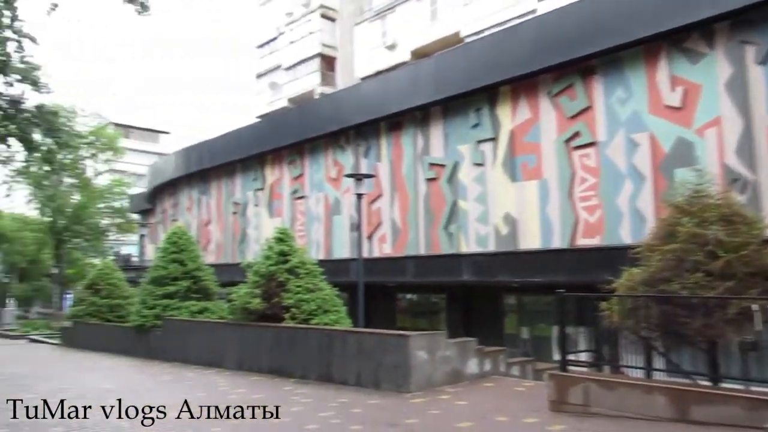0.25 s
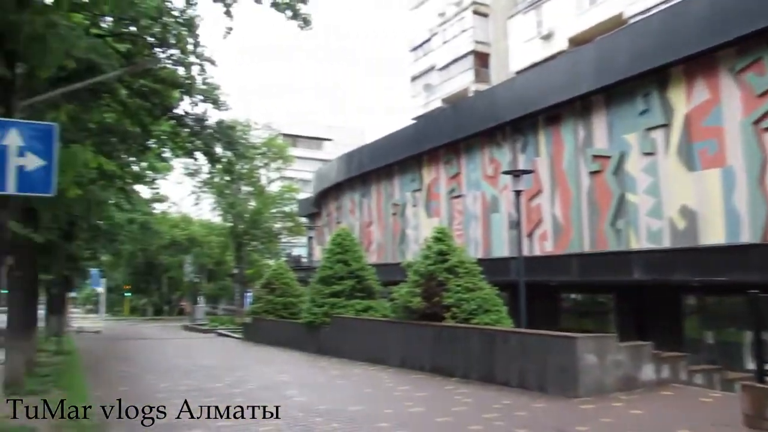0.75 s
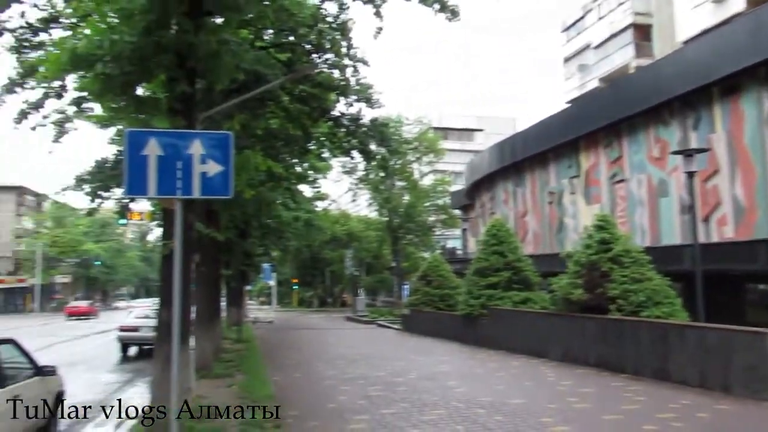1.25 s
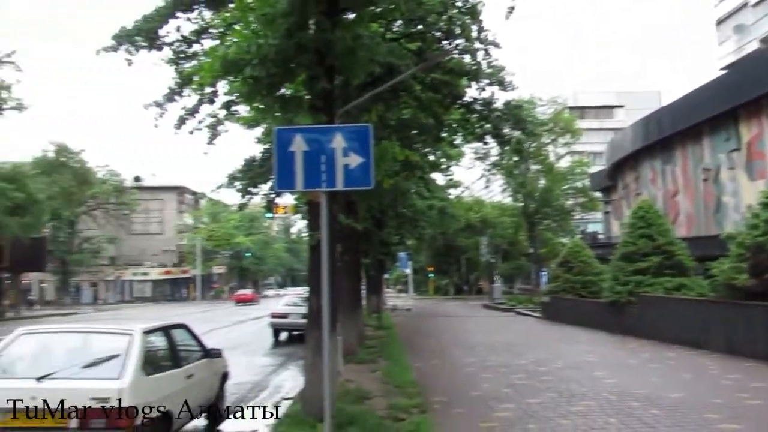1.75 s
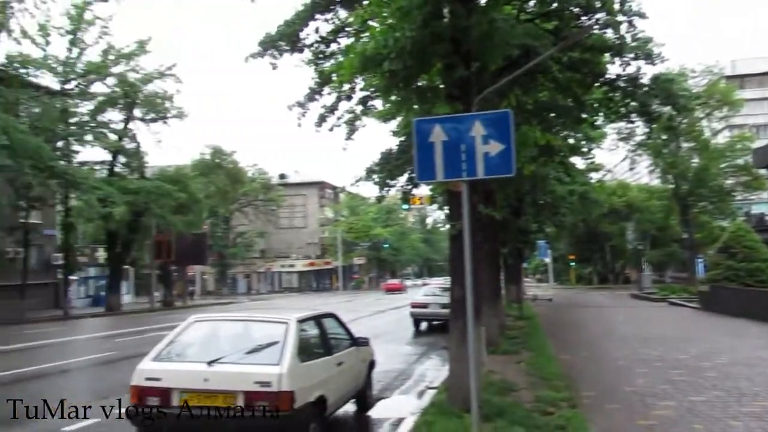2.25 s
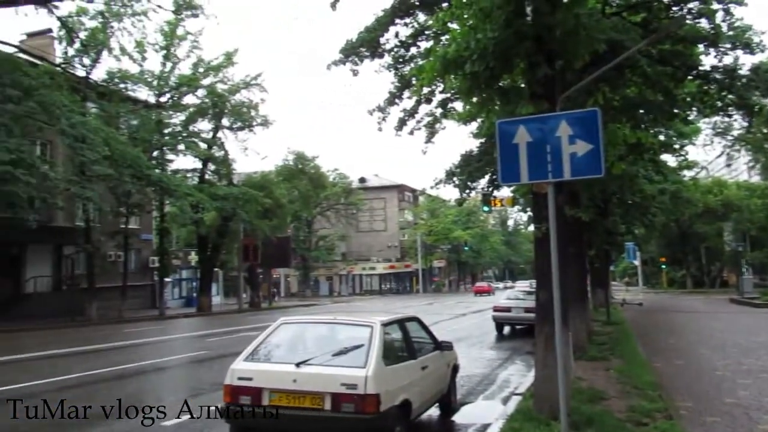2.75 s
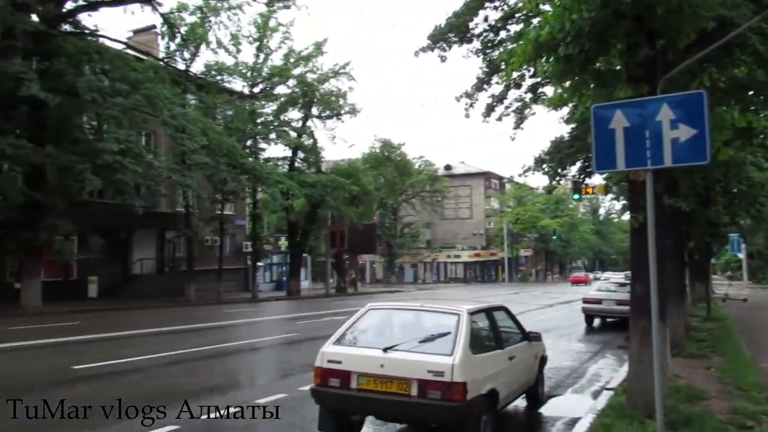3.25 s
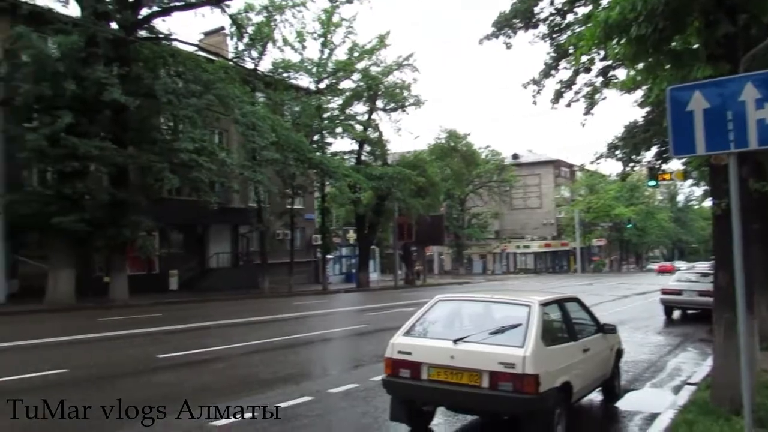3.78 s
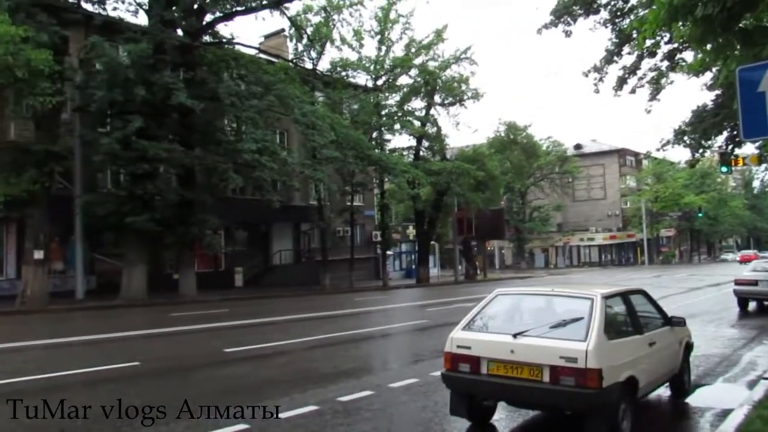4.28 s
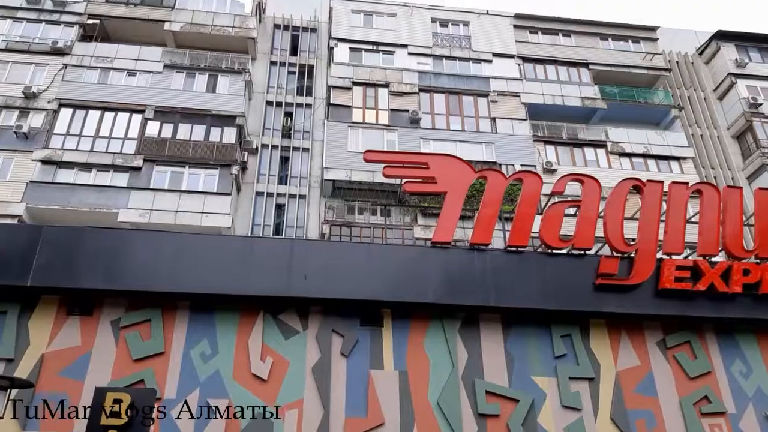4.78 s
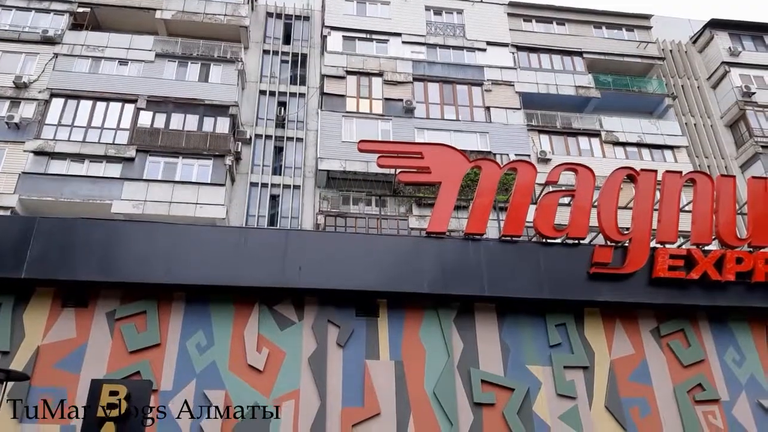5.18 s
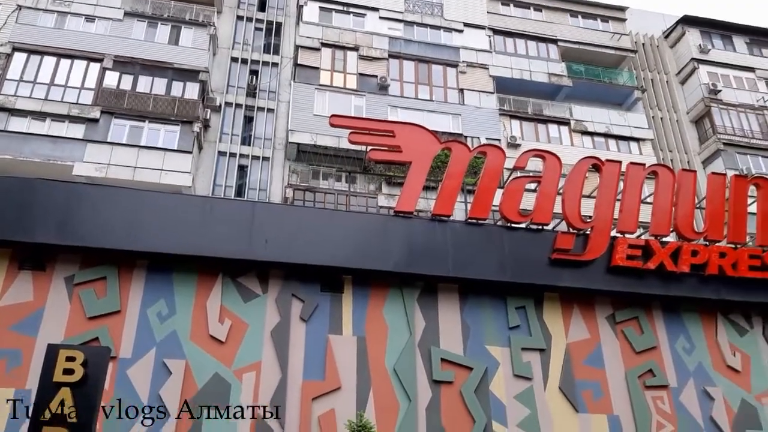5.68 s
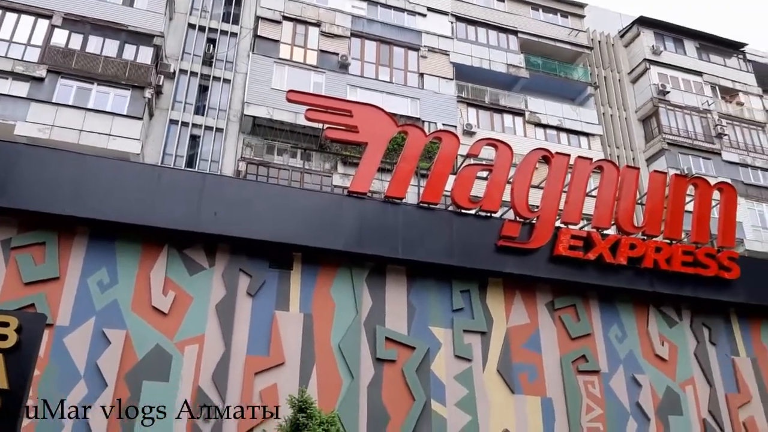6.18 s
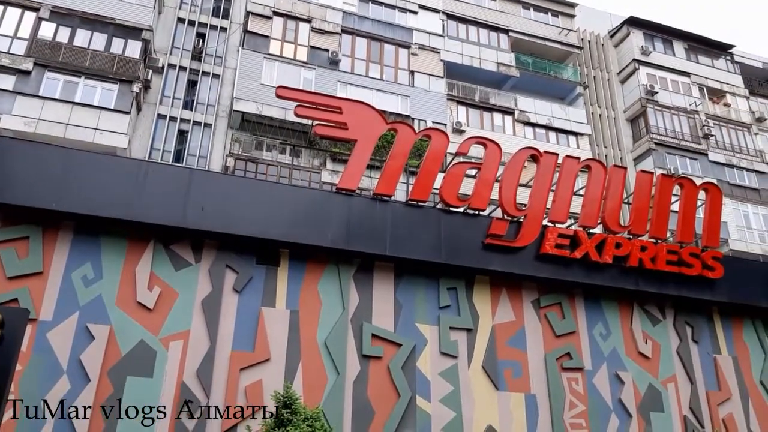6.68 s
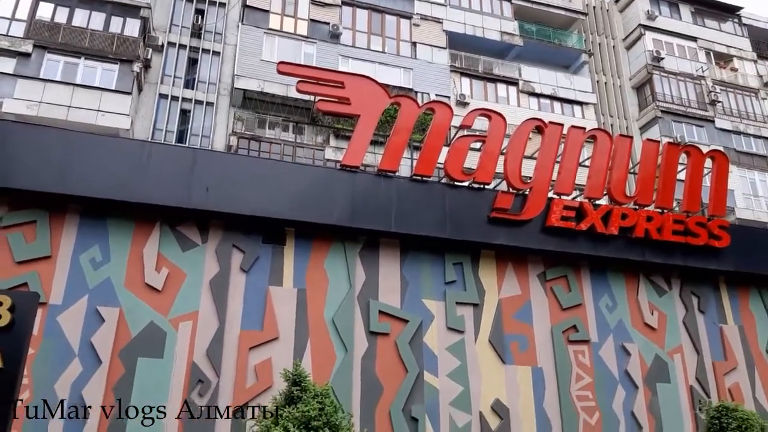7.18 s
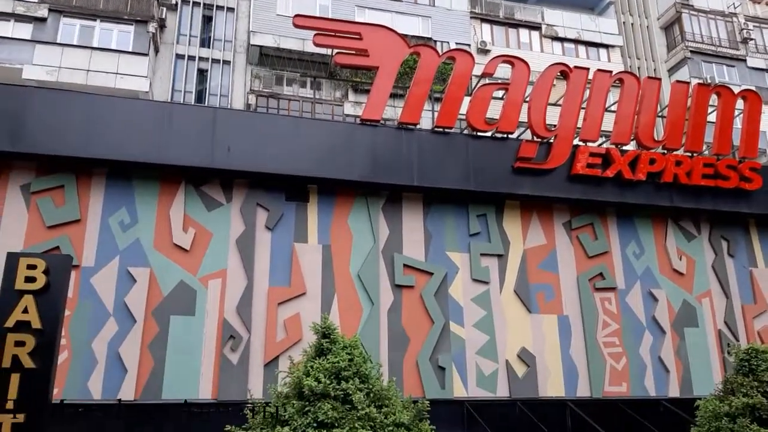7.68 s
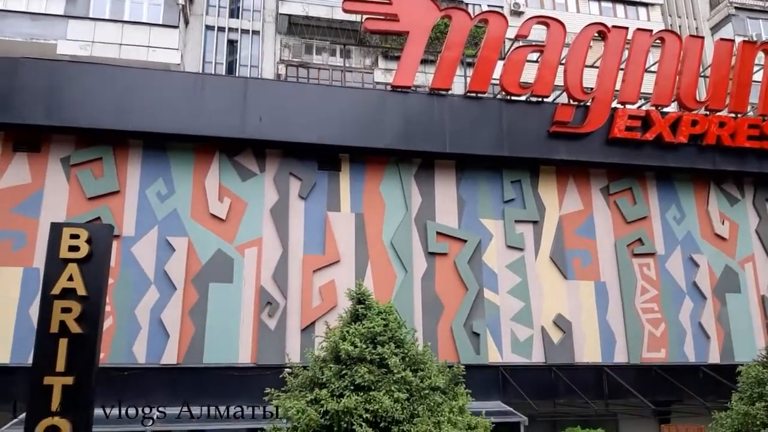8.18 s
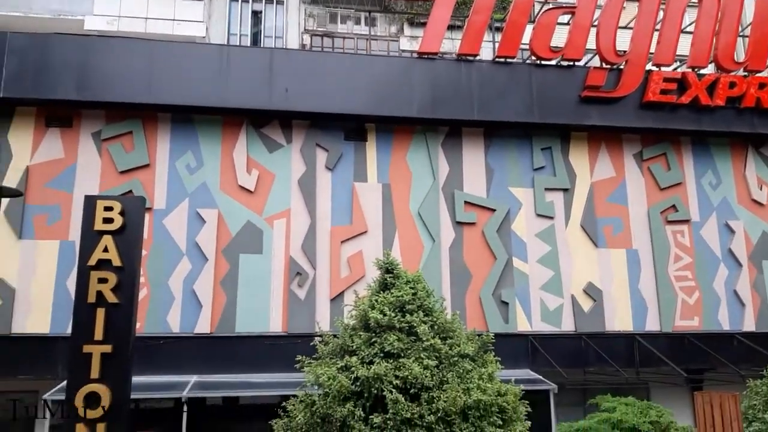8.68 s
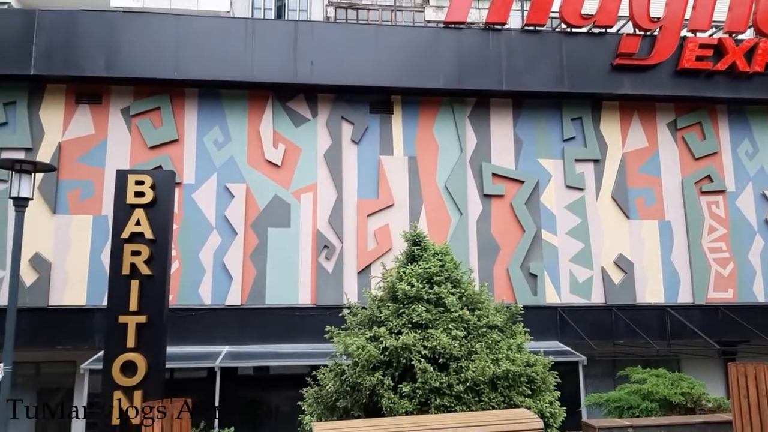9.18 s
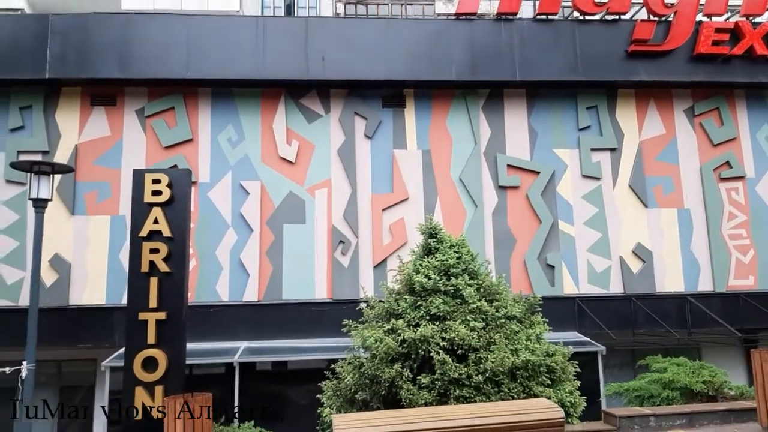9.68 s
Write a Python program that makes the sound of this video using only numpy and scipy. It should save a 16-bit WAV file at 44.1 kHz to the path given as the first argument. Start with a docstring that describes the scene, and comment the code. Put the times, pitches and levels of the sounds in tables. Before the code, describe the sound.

Outdoors on a wet city street, stereo microphone close to the lane: lumpy low rumble, idling engine and drone, broad tyre roar, a couple of dull wheel thumps near one second, and sizzling spray growing as a car nears. An abrupt cut and tiny silence at 4.6 seconds, then a quieter spot back from the road: tyre hiss fades while a heavy vehicle pulls away, rising in pitch with metallic rattle, faint ticks, brief bird chirps and thin brake squeals.

```python
"""Wet city street, two spots. At the kerb: lumpy rumble noise, idling engine and drone as sine orders,
tyre roar as shaped noise, rising spray of a nearing car as dense clicks, a few wheel thumps.
After a short silence, set back from the road: rumble, hiss and spray noise; a heavy vehicle pulls away,
its orders swelling and sinking as they rise, its rattle as clicks ringing in metal modes.
Treble ticks are noise bursts, birds short fluttering notes, brake squeals a stuttering sine."""
import sys
import numpy as np
from scipy import signal
from scipy.io import wavfile
from scipy.ndimage import uniform_filter1d

SR = 44100
rng = np.random.default_rng(int(sys.argv[2]) if len(sys.argv) > 2 else 0)


def inscribe(sig):
    """Save sig as 16-bit PCM at rate SR to the path in sys.argv[1].

    A 1-D sig is mono; a 2-D sig holds one channel per row.
    Samples are clipped to [-1, 1] before scaling.
    """
    pcm = np.round(np.clip(np.atleast_2d(sig).T, -1, 1) * 32767)
    wavfile.write(sys.argv[1], SR, pcm.astype(np.int16))


N = 438354
STOP_S, RESUME_S = 4.5834, 4.6192   # silence between the spots

# Stereo pairs: f/Hz, likeness 0-1, right lead/rad, right level/dB
KERB_PAIR = [(40, .95, 1.8, -5), (90, 0.98, 1.3, -4.5), (200, 1, 0.75, -2.5), (450, 0.82, -0.0024, -2.5),
             (1000, 0.85, 0.2, -2), (1500, 0.93, 0.29, -0.5), (2020, 1, -0.016, -0.5),
             (3930, 1, -0.16, 0.1), (5500, 0.77, -0.29, -1), (11000, 0.66, -1.38, -2.5),
             (15000, .25, -1.5, -1.5)]
BACK_PAIR = [(40, 0.99, .95, -5), (150, 1, 1.02, -3), (297, 0.64, 0.45, 1), (510, .42, 0.49, -2),
             (734, 0.53, 2.7, -2.5), (965, 0.34, 5.14, 0), (1370, 0.75, 5.7, -1.5), (1900, 0.25, 7, 1.5),
             (3070, 0.18, 8.2, 6.5), (5170, 0.14, 7.1, -4.5), (9000, 0.24, 9.1, 0), (12500, .1, 8.1, -4.5)]
SPRAY_PAIR = [(3000, .5, 9, 5), (3900, 0.55, 7.4, 3), (4800, .5, 6.3, 0), (7500, 0.3, 9.5, 0.5),
              (12000, .2, 8, 0)]
RATTLE_PAIR = [(1500, 1, 3.14, 28), (2400, 1, 3.14, 24), (3600, 1, 3.14, 12)]
BIRD_PAIR = [(5300, .95, 1.7, -.5), (10700, .95, 1.3, 2.5)]
SQUEAL_PAIR = [(7000, .95, 1.6, -5), (8000, .95, 1.6, -5)]
BACK_LAG_S, RATTLE_LAG_S = 0.00032, 0.00045   # right channel late
TYRES_MOST_ALIKE = 0.97   # upper limit on the likeness of left and right in the tyre roar

# Noise spectra: f/Hz, relative density/dB
KERB_RUMBLE_SPECTRUM = [(25, -23), (45, -4), (70, 0.5), (130, 0.5), (250, -0.5), (450, -5), (800, -10.5),
                        (1500, -65)]
KERB_TYRES_SPECTRUM = [(300, -27.5), (700, -3), (1050, -1), (1600, -6), (2500, -11), (3800, -16),
                       (7000, -21), (11000, -31), (13500, -54), (14500, -67)]
KERB_SPRAY_SPECTRUM = [(1500, -1.5), (3500, -5), (6000, 1.5), (8000, 2), (10500, 0.5), (12500, -5),
                       (14200, -11), (15000, -37)]
BACK_RUMBLE_SPECTRUM = [(25, -48), (50, -5.5), (90, 3), (180, -7), (300, -6), (380, -14.5), (700, -17),
                        (1500, -43)]
BACK_HISS_SPECTRUM = [(400, -3), (700, 0), (1000, 2.5), (1150, 1), (1450, -2), (1950, -5), (2500, -7.5),
                      (3050, -10), (4500, -12.5), (7500, -22), (9000, -30.5), (10500, -38), (15700, -53)]
BACK_SPRAY_SPECTRUM = [(2500, -50), (3300, 0), (3900, 5.5), (4600, 0), (7000, -4.5), (9000, -11),
                       (10200, -12), (15700, -56)]
CITY_AIR_SPECTRUM = [(5000, -18), (9000, -2), (11000, -11), (13500, -17), (15700, 4)]
# Cancellation by the echo off the road
DIP_HZ, DIP_WIDTH_HZ, DIP_DEPTH = 696, 270, 0.86

# Level curves: start/dB, slope/(dB/s), bend/(dB/s^2)
KERB_RUMBLE_LEVEL = (-26, -0.98, 0.043)
KERB_TYRES_LEVEL = (-28.5, -0.59, 0.18)
BACK_RUMBLE_LEVEL = (-34.5, -0.23, -0.2)
# Same columns, ahead of the stereo pair
RATTLE_LEVEL = (-35.5, -0.34, -0.12)
# Rumble swells: t/s, half width/s, level/dB
SURGES = [(.5, 0.13, 1), (2.42, 0.34, -1.5), (1.96, 0.1, 1.5)]
LUMPS_SPLIT_HZ, LUMPS_DB = 150, 1.0
SPRAY_FAR_DB, SPRAY_NEAR_DB, SPRAY_MIDWAY_S, SPRAY_RISE_S = -41, -29, 2.07, 0.45
# Tyre hiss passing on the road: t/s, level/dB
BACK_HISS_LEVEL = [(4.62, -36.5), (5.05, -37.5), (5.4, -36), (5.8, -36.5), (6.8, -39.5), (7.8, -41.5),
                   (8.8, -43), (9.94, -47.5)]
# Cars throwing spray further off: loudest t/s, level/dB, fade/(dB/s^2)
SPRAY_PASSES = [(4.62, -41, 100), (5.1, -46.5, 17), (8.2, -57.5, 30), (9.4, -59, 60)]
CITY_AIR_DB = -70

# Idling engine: t/s, firing f/Hz, order 2 level/dB, order 3 level/dB
IDLE = [(0, 59.37, -41, -45), (.5, 59.7, -28.5, -37), (.75, 59.56, -41, -41.5), (1.9, 60.6, -45, -36),
        (2.3, 61, -53, -40), (2.9, 61.94, -34.5, -55), (3.3, 62.2, -41, -34.5), (4.58, 62.47, -39, -38)]
# Low exhaust note further off: t/s, f/Hz, level/dB
DRONE = [(0, 64.2, -44), (.4, 75, -36), (1.45, 78.3, -34), (1.7, 65, -43), (2.64, 64.34, -29),
         (2.9, 74, -50), (4.58, 80, -39)]
# Wheel hits a dent: t/s, half length/s, f/Hz, level/dB
THUMPS = [(.955, .015, 215, -25), (1.122, .016, 240, -21), (1.125, .012, 100, -22)]

# Engine pulling away: t/s, firing f/Hz, load level/dB
PULL = [(4.62, 40.04, -12), (5.35, 45.23, -4), (5.63, 47.48, 1.5), (6.32, 53.86, 0), (6.9, 57.95, -2),
        (7.6, 65.04, -1), (8.19, 67.7, 1), (8.56, 71.5, -2.5), (9.17, 77.4, -2), (9.94, 80.54, -7.5)]
# Multiples of firing f, half orders from uneven cylinders: order, relative level/dB
PULL_ORDERS = [(1, 3.5), (1.5, -14), (2, -1), (2.5, -15), (3, -6), (4, -10.5)]
# Gain by pitch, makes the engine orders swell and sink as they rise: f/Hz, gain/dB
PITCH_GAIN = [(40, -41), (47, -55), (53, -39.5), (56, -47), (62, -44.5), (66, -36), (68.3, -45.5),
              (71, -32), (74.5, -38.5), (77, -38.5), (81, -35), (90, -36.5), (96, -32.5), (100, -36.5),
              (104, -30.5), (112, -37.5), (118, -31), (122, -37), (126, -32.5), (129, -38.5), (136, -30.5),
              (142, -38.5), (149, -33.5), (154, -41.5), (160, -38.5), (170, -42.5), (178, -36), (190, -50),
              (205, -41), (216, -35.5), (228, -43), (260, -45), (285, -37.5), (305, -42), (330, -46)]

# Metal resonances, changing as the vehicle recedes: f/Hz, one-pass width/Hz, level/dB, change/(dB/s)
RATTLE_MODES = [(2227, 700, 5, -0.26), (1914, 1170, 1, -.6), (2470, 530, -10.5, 2.5), (4150, 90, -20, 1.5)]
# Jolts shaking the loose metal: t/s, half length/s, f/Hz, level ahead of the pair/dB
JOLTS = [(6.88, .009, 2300, -33), (7.225, 0.022, 2305, -38), (7.45, .006, 2550, -33),
         (7.577, .011, 2500, -33), (7.634, .012, 2550, -36), (7.668, 0.016, 2230, -35.5),
         (8.988, .015, 2336, -39), (9.472, 0.014, 2300, -40), (9.789, .008, 2240, -38),
         (9.806, .006, 2500, -37)]
JOLT_WIDTH_HZ, RATTLE_LEFT_DB = 400, -24

# Clearest treble ticks: t/s, burst level ahead of high-pass/dB
TICKS = [(5.7, -61), (6.15, -63), (6.44, -60), (6.51, -58), (6.712, -60), (7.2, -60), (7.255, -63),
         (7.418, -59), (7.444, -58), (8.105, -61), (8.28, -61), (9.531, -62)]
TICK_DECAY_S, TICK_ABOVE_HZ = 0.007, 6000
FAINT_TICKS_PER_S, FAINT_TICK_DB = 8, -68

# Bird notes: t/s, length/s, start f/Hz, end f/Hz, level/dB, overtone/dB, breath/dB
CHIRPS = [(6.26, .024, 5300, 5380, -39, -8, -5), (6.281, .024, 5300, 5380, -43, -14, -4),
          (6.29, .04, 5350, 5330, -51, -4, 0), (6.245, .085, 5950, 5700, -54, -30, 6),
          (9.158, .028, 5000, 5450, -52, -19, 3), (9.17, .045, 5200, 5100, -58, -11, 7),
          (9.178, .028, 6230, 6050, -41, -30, -2), (9.2, .042, 6120, 6250, -47, -30, -2)]
THROB_DB = 1.8   # spread of the level drift that breaks up the notes

# Brake grips: start t/s, end t/s, level/dB
SQUEALS = [(6.789, 6.84, -49), (6.9, 6.915, -52), (7.008, 7.03, -51), (7.076, 7.11, -51),
           (7.16, 7.175, -56), (7.21, 7.285, -53), (7.31, 7.32, -56), (7.39, 7.465, -52),
           (7.545, 7.56, -59), (7.59, 7.61, -59)]
SQUEAL_HZ, SQUEAL_RISE_DB_PER_S, SQUEAL_FALL_DB_PER_S = 7628, 139, 450

RECORDER_HISS_DB, CUTOFF_HZ = -100, 15760


def amp(db):
    """dB to linear gain."""
    return 10 ** (np.asarray(db) / 20)


def rms_one(x):
    """Scales to rms 1 over all channels."""
    return x / np.sqrt(np.mean(x ** 2) + 1e-20)


def times_s():
    """Time of every sample."""
    return np.arange(N) / SR


def bins_hz():
    """FFT bin frequencies, offset to keep the log finite."""
    return np.arange(N // 2 + 1) * SR / N + .01


def in_time(rows):
    """Columns of a time table, one value a sample."""
    s, *columns = np.transpose(rows)
    return [np.interp(times_s(), s, c) for c in columns]


def on_bins(rows):
    """Columns of a frequency table, one value an FFT bin, on a log f axis."""
    hz, *columns = np.transpose(rows)
    log_hz = np.log(bins_hz())
    return [np.interp(log_hz, np.log(hz), c) for c in columns]


def fading(level, from_s=0):
    """Level in dB with a steady rate and a bend."""
    t = times_s() - from_s
    return level[0] + level[1] * t + level[2] * t ** 2


def drift(rate_hz):
    """Slow chance of spread 1: two-pole low-passed noise, run at SR / 40."""
    r = np.exp(-2 * np.pi * rate_hz * 40 / SR)
    noise = rng.standard_normal(N // 40 + 2002)
    slow = signal.lfilter([1], [1, -2 * r, r * r], noise)[2000:]   # settled part
    return np.interp(np.arange(N) / 40, np.arange(len(slow)), rms_one(slow))


def noises():
    """Two unrelated streams of white noise."""
    return rng.standard_normal((2, N))


def grains(per_s, spread_db):
    """Two unrelated streams of random clicks of uneven size."""
    size_db = spread_db * np.minimum(rng.exponential(1, (2, N)), 4)
    sizes = amp(size_db) * rng.choice([-1, 1], (2, N))
    return rms_one(sizes * (rng.random((2, N)) < per_s / SR))


def at_ports(streams, pair, colour=1, lag_s=0, most_alike=1):
    """Colours two streams, mixes them to left and right with the pair's likeness, phase and level."""
    alike, lead_rad, right_db = on_bins(pair)
    alike = np.clip(alike, 0, min(most_alike, 1))
    main, other = np.fft.rfft(streams) * colour
    turn = amp(right_db) * np.exp(1j * (lead_rad - 2 * np.pi * bins_hz() * lag_s))
    right = turn * (alike * main + np.sqrt(1 - alike ** 2) * other)
    return np.fft.irfft([main, right], N)


def mono_at(tone, pair, lag_s=0):
    """Places one stream in the pair, with no unrelated part."""
    return at_ports([tone, 0 * tone], pair, lag_s=lag_s)


def kerb_layer(streams, spectrum, most_alike=1):
    """Shaped noise close to the lane, notched by the road echo."""
    dip = 1 - DIP_DEPTH / (1 + (2 * (bins_hz() - DIP_HZ) / DIP_WIDTH_HZ) ** 2)
    colour = dip * amp(on_bins(spectrum)[0])
    return rms_one(at_ports(streams, KERB_PAIR, colour, most_alike=most_alike))


def lumpy(x):
    """Deep and upper parts of a rumble each swell on their own."""
    deep = signal.sosfilt(signal.butter(2, LUMPS_SPLIT_HZ, fs=SR, output="sos"), x)
    return deep * amp(LUMPS_DB * drift(4.0)) + (x - deep) * amp(LUMPS_DB * drift(5.0))


def kerb_rumble():
    """Low traffic noise with slow lumps and set swells."""
    t = times_s()
    surge_db = sum(db * np.exp(-((t - s) / half_s) ** 2) for s, half_s, db in SURGES)
    level_db = fading(KERB_RUMBLE_LEVEL) + surge_db + 0.58 * drift(26.0)
    return amp(level_db) * lumpy(kerb_layer(noises(), KERB_RUMBLE_SPECTRUM))


def kerb_tyres(puddles):
    """Tyre roar: broad noise swaying with the water on the road."""
    level_db = fading(KERB_TYRES_LEVEL) + 0.3 * puddles + 0.45 * drift(10.0)
    return amp(level_db) * kerb_layer(noises(), KERB_TYRES_SPECTRUM, TYRES_MOST_ALIKE)


def kerb_spray(puddles):
    """Droplets as dense clicks, growing on an S-curve as the car nears."""
    growth = 1 / (1 + np.exp((SPRAY_MIDWAY_S - times_s()) / SPRAY_RISE_S))
    level_db = SPRAY_FAR_DB + (SPRAY_NEAR_DB - SPRAY_FAR_DB) * growth
    level_db = level_db + 0.4 * puddles + 0.8 * drift(22.0)
    return amp(level_db) * kerb_layer(grains(15000.0, 2.5), KERB_SPRAY_SPECTRUM)


def engine(firing_hz, levels_db, orders, wobble, rough_db):
    """Firing orders as sines of wavering strength on one wobbling phase; levels are rms."""
    phase = 2 * np.pi * np.cumsum(firing_hz * (1 + wobble * drift(5.0))) / SR
    tone = sum(amp(db + rough_db * drift(5.1)) * np.sin(k * phase) for k, db in zip(orders, levels_db))
    return np.sqrt(2) * tone


def idling():
    """Idling engine: orders 2 and 3 of the firing rate."""
    firing_hz, *levels_db = in_time(IDLE)
    return engine(firing_hz, levels_db, [2, 3], wobble=0.0028, rough_db=2.5)


def drone():
    """Far exhaust note: one wandering sine."""
    hz, *levels_db = in_time(DRONE)
    return engine(hz, levels_db, [1], wobble=0.0212, rough_db=2.0)


def thumps():
    """Wheel hitting a dent: short low tones under a bell envelope."""
    t, tone = times_s(), np.zeros(N)
    for s, half_s, hz, db in THUMPS:
        swell = np.exp(-((t - s) / half_s) ** 2)
        tone += amp(db) * swell * np.cos(2 * np.pi * hz * (t - s))
    return tone


def kerb():
    """All sounds close to the lane."""
    puddles = drift(6.9)   # uneven water sways roar and spray together
    tones = mono_at(idling() + drone() + thumps(), KERB_PAIR)
    return kerb_rumble() + tones + kerb_tyres(puddles) + kerb_spray(puddles)


def back_layer(spectrum, pair=BACK_PAIR):
    """Shaped noise as heard set back from the road."""
    return rms_one(at_ports(noises(), pair, amp(on_bins(spectrum)[0]), BACK_LAG_S))


def back_rumble():
    """Far traffic: low noise, slowly drifting."""
    level_db = fading(BACK_RUMBLE_LEVEL, RESUME_S) + 0.85 * drift(0.87)
    return amp(level_db) * back_layer(BACK_RUMBLE_SPECTRUM)


def back_hiss():
    """Tyre hiss: noise with slow and fast level drift."""
    level_db = in_time(BACK_HISS_LEVEL)[0] + 0.66 * drift(2.5) + 0.78 * drift(30.0)
    return amp(level_db) * back_layer(BACK_HISS_SPECTRUM)


def back_spray():
    """Spray of passing cars: noise following the loudest pass."""
    t = times_s()
    passes_db = np.max([db - fade * (t - s) ** 2 for s, db, fade in SPRAY_PASSES], axis=0)
    return amp(passes_db + 0.84 * drift(25.0)) * back_layer(BACK_SPRAY_SPECTRUM, SPRAY_PAIR)


def city_air():
    """Faint flickering treble fizz."""
    return amp(CITY_AIR_DB + 1.2 * drift(7.0) + 1.8 * drift(25.0)) * back_layer(CITY_AIR_SPECTRUM)


def pulling_away():
    """Engine speeding up: each order swells and sinks with the gain at its pitch."""
    firing_hz, load_db = in_time(PULL)
    hz, gain_db = np.transpose(PITCH_GAIN)
    orders, levels_db = [], []
    for k, order_db in PULL_ORDERS:
        pitch_db = np.interp(np.log(k * firing_hz), np.log(hz), gain_db)
        orders.append(k)
        levels_db.append(load_db + order_db + pitch_db)
    tone = engine(firing_hz, levels_db, orders, wobble=0.004, rough_db=2.6)
    return mono_at(tone, BACK_PAIR, BACK_LAG_S)


def resonance(x, hz, width_hz):
    """Steep resonance: the same two-pole peak applied twice."""
    r = np.exp(-np.pi * width_hz / SR)
    b = np.array([1, 0, -1]) * (1 - r * r) / 2
    a = [1, -2 * r * np.cos(2 * np.pi * hz / SR), r * r]
    return signal.lfilter(b, a, signal.lfilter(b, a, x))


def rattle():
    """Dense uneven metal knocks ringing in broad modes, with louder jolts; mostly on the right."""
    t, clicks = times_s(), grains(2500.0, 0.67)
    knocks = clicks[0] * amp(1.0 * drift(22.0) + 0.71 * drift(30.0))
    rung = np.zeros(N)
    for hz, width_hz, db, change_db_per_s in RATTLE_MODES:
        rung += amp(db + change_db_per_s * (t - RESUME_S)) * resonance(knocks, hz, width_hz)
    out = amp(fading(RATTLE_LEVEL, RESUME_S)) * rms_one(rung)
    for s, half_s, hz, db in JOLTS:
        start = round((s - 2 * half_s) * SR)
        span = slice(start, start + round(4 * half_s * SR))
        swell = np.exp(-((t[span] - s) / half_s) ** 2)
        out[span] += amp(db) * swell * rms_one(resonance(clicks[1, span], hz, JOLT_WIDTH_HZ))
    return amp(RATTLE_LEFT_DB) * mono_at(out, RATTLE_PAIR, RATTLE_LAG_S)


def ticking():
    """Treble noise bursts dying exponentially, at set and at random moments."""
    hits = rng.random(N) < FAINT_TICKS_PER_S / SR
    jumps = hits * rng.exponential(amp(FAINT_TICK_DB), N) + 1e-18
    s, db = np.transpose(TICKS)
    jumps[(s * SR).astype(int)] = amp(db)
    envelope = signal.lfilter([1], [1, -np.exp(-1 / (TICK_DECAY_S * SR))], jumps)
    high_pass = signal.butter(2, TICK_ABOVE_HZ, "high", fs=SR, output="sos")
    return signal.sosfilt(high_pass, envelope * noises())


def birds():
    """Short rough notes: fluttering whistle, one overtone, breathy noise around the pitch."""
    out, flutter = np.zeros(N), drift(150.5)
    smooth = uniform_filter1d(rng.standard_normal(N), size=30)
    breath = rms_one(uniform_filter1d(smooth, size=22))
    for s, length_s, start_hz, end_hz, db, overtone_db, breathy_db in CHIRPS:
        i, n = round(s * SR), round(length_s * SR)
        span = slice(i, i + n)
        hz = np.linspace(start_hz, end_hz, n) * (1 + 0.004 * flutter[span])
        phase = 2 * np.pi * np.cumsum(hz) / SR
        whistle = np.sin(phase) + amp(overtone_db) * np.sin(2 * phase)
        envelope = np.sin(np.pi * np.linspace(0, 1, n) ** 1.2)
        out[span] += amp(db) * envelope * (1 + amp(breathy_db) * breath[span]) * whistle
    return mono_at(out * amp(THROB_DB * drift(72.0)), BIRD_PAIR)


def squeal():
    """Stuttering brake whistle: holds while the pad grips, swells in slowly, lets go fast."""
    t, grips_db = times_s(), []
    for start_s, end_s, db in SQUEALS:
        rise_db, fall_db = SQUEAL_RISE_DB_PER_S * (start_s - t), SQUEAL_FALL_DB_PER_S * (t - end_s)
        grips_db.append(db - np.maximum(0, np.maximum(rise_db, fall_db)))
    level_db = np.max(grips_db, axis=0) + 1.6 * drift(35.0)
    phase = 2 * np.pi * np.cumsum(SQUEAL_HZ * (1 + 0.0006 * drift(10.0))) / SR
    return mono_at(amp(level_db) * np.sqrt(2) * np.sin(phase), SQUEAL_PAIR)


def set_back():
    """All sounds set back from the road."""
    traffic = back_rumble() + back_hiss() + back_spray() + city_air()
    return traffic + pulling_away() + rattle() + ticking() + birds() + squeal()


def scene():
    """Kerb cut off at STOP_S: drops 26 dB, fades out within milliseconds; second spot starts at once."""
    t = times_s()
    cut_db = np.where(t < STOP_S, 0, -26.0 - 1130.0 * (t - STOP_S))   # slope in dB/s
    opening = np.clip((t - RESUME_S) / 0.0006, 0, 1)
    return kerb() * amp(cut_db) + set_back() * opening


def record(dry):
    """Adds faint white hiss, then cuts the top with a steep low-pass."""
    hiss = amp(RECORDER_HISS_DB) * rng.standard_normal(dry.shape)
    low_pass = signal.ellip(14, 0.5, 80, CUTOFF_HZ, fs=SR, output="sos")
    return signal.sosfilt(low_pass, dry + hiss)


dry = scene()
out = record(dry)
inscribe(out)
```